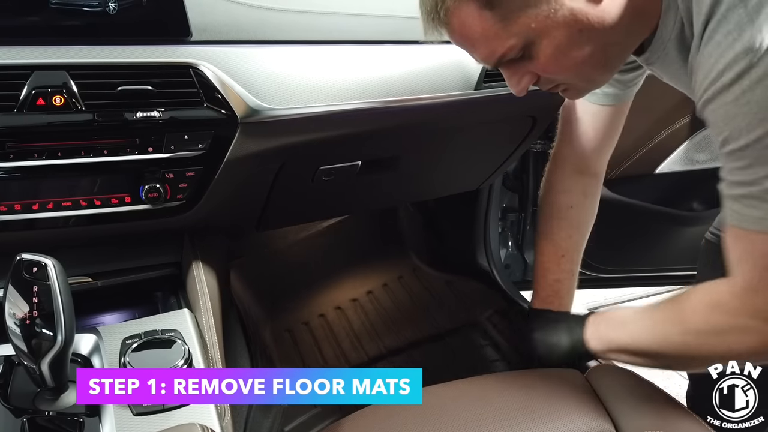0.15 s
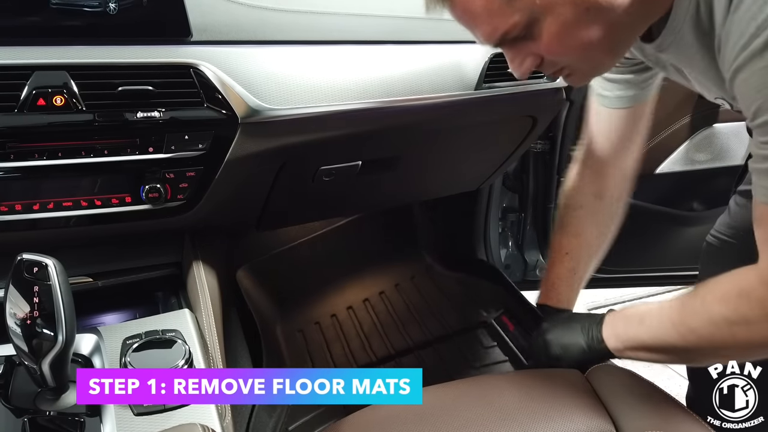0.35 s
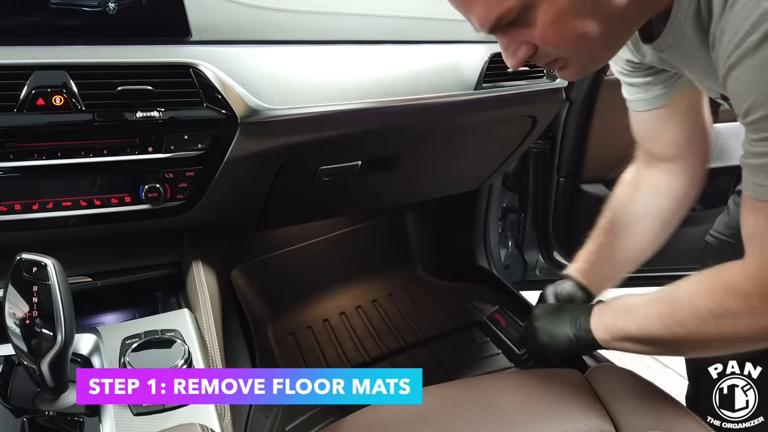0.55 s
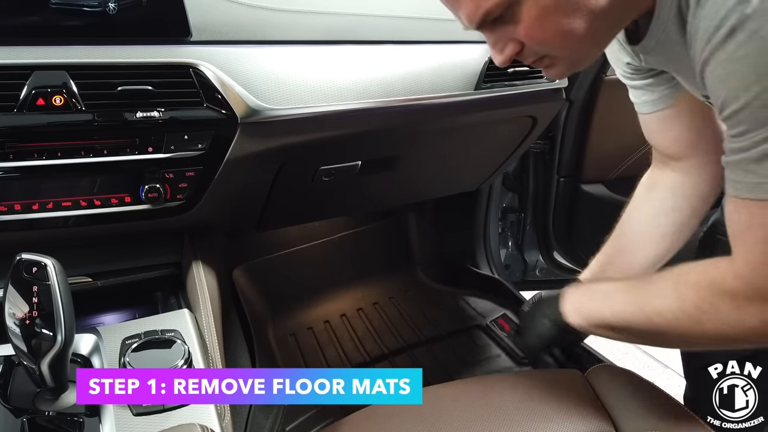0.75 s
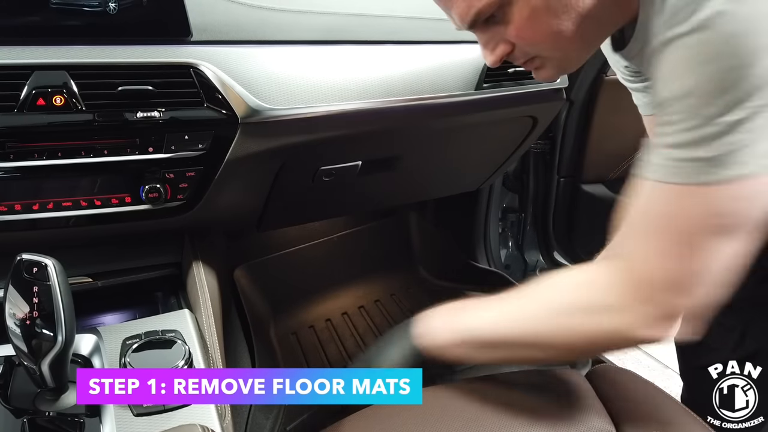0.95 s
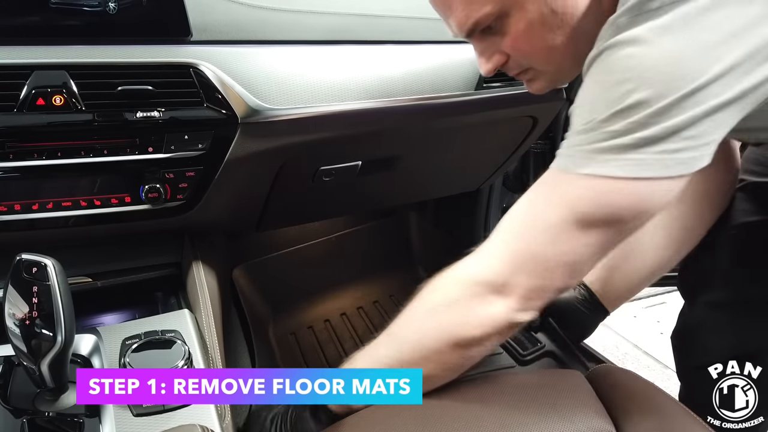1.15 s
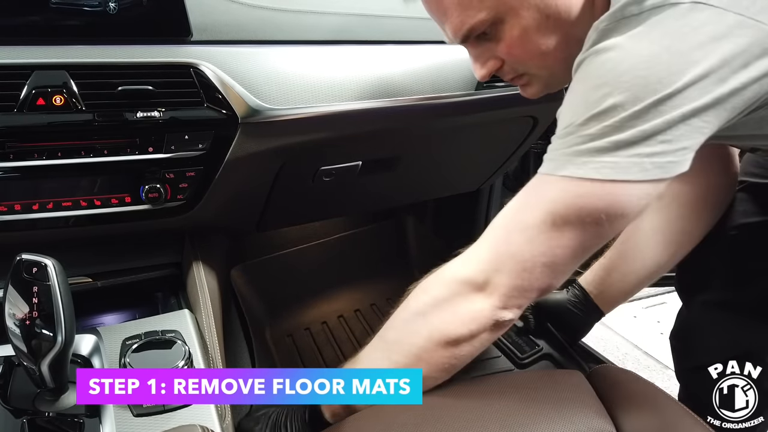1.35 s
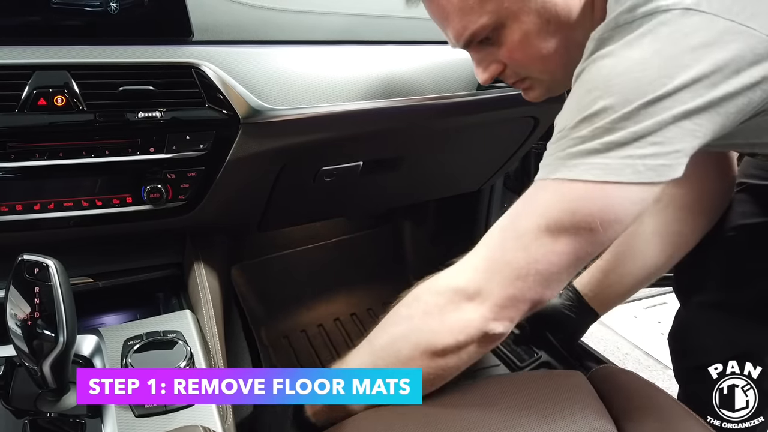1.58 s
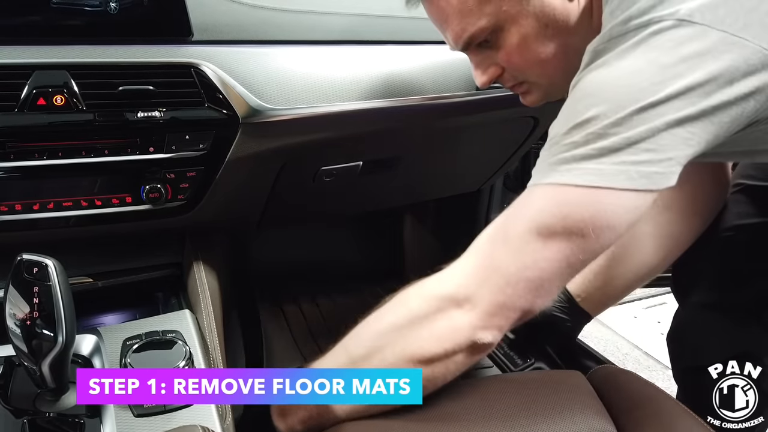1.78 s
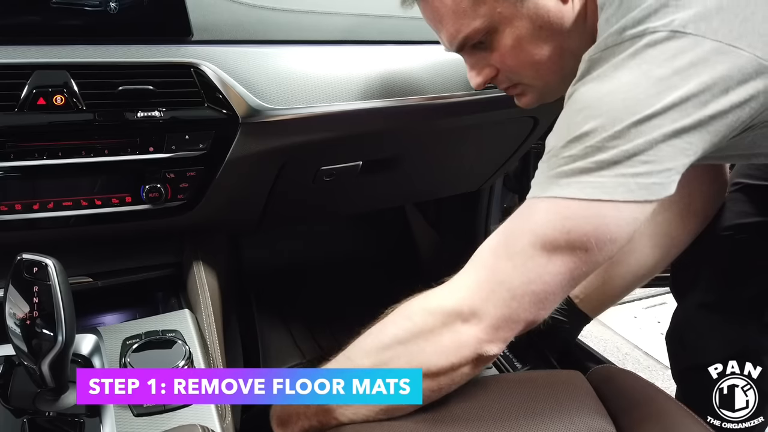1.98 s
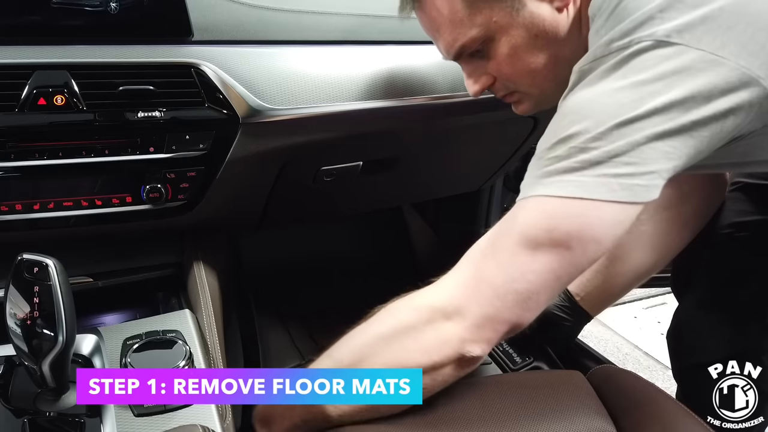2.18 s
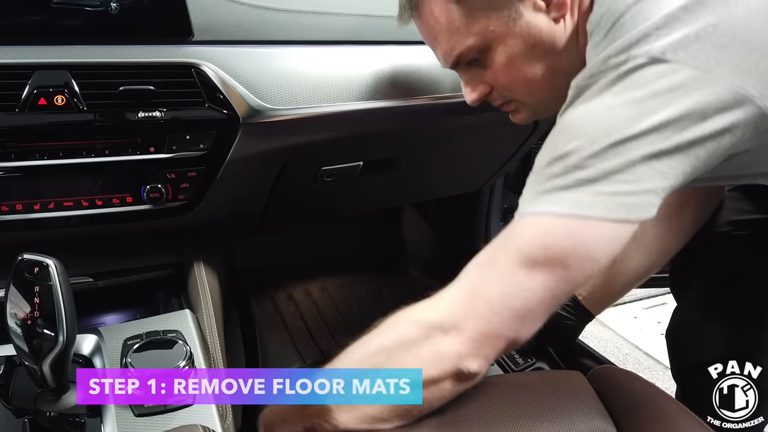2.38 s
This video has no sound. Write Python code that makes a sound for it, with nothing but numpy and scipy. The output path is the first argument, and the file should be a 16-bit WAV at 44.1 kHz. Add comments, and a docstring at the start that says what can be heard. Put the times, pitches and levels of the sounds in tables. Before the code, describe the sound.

Heard close inside a quiet car cabin: a rubber mat thuds in the footwell, scrapes softly and bends with low rumbles, then flops twice around two seconds with short cracks, leaving a faint garage tail.

```python
"""A faint bed of air, then a dull thump: a rubber floor mat worked loose in a car footwell,
heard close by from inside the cabin with the door open. Damped modes and short noise make the flops,
grains the scuffs and the short cracks and knocks of the flops, wavering tones the judders on the trim,
and shaped noise the flexing sheet, the sleeves and the air. A faint noise tail is the garage outside."""
import sys
import numpy as np
from scipy import signal
from scipy.fft import rfft, irfft
from scipy.io import wavfile
from scipy.ndimage import uniform_filter1d

SR = 44100
rng = np.random.default_rng(int(sys.argv[2]) if len(sys.argv) > 2 else 0)


def digitize_waveform(pressure):
    """Quantize a signal to 16-bit integers and store it at the path in sys.argv[1].

    Rows of a 2-D input are taken as channels; values are limited to [-1, 1].
    """
    field = np.atleast_2d(pressure).T
    bounded = np.clip(field, -1, 1)
    quanta = np.round(bounded * 32767).astype(np.int16)
    wavfile.write(sys.argv[1], SR, quanta)


N = 105840  # samples, 2.4 s

# Spectrum of the background air: [f/Hz, relative level/dB]
AIR_SPECTRUM = [(20, -2.5), (60, 5), (120, -26), (250, -20), (500, -20.5), (1100, -24), (2500, -29),
                (4000, -36), (9000, -42), (10400, -38), (12000, -40), (14000, -62)]
AIR_DB = -63.5
# Side against mid, narrow in the bass and wide in the treble: [f/Hz, level/dB]
STEREO_WIDTH = [(50, -23.5), (150, -39.5), (700, -21), (1400, -10.5), (2800, -4.5), (5000, -2), (15000, -2)]
LEFT_LAG_S = 0.00007
TOP_HZ = 15560

# Spectrum of the garage tail: [f/Hz, relative level/dB]
GARAGE_SPECTRUM = [(60, -12.5), (180, 0.5), (320, -3), (600, -3), (1800, -3.5), (3000, 6.5), (15000, -5)]
GARAGE_DB, GARAGE_T60_S, GARAGE_ATTACK_S = -15, 0.89, 0.016
# Resonances of the cabin that colour grains, tail, rustle and air: [f/Hz, width/Hz, boost/dB]
CABIN_RESONANCES = [(1328, 20, 4.5), (1683, 25, 0.5), (2434, 27, 4.5), (2665, 61, 5.5)]

# Rustle of sleeves and gloves over time: [t/s, level before the lift/dB]
RUSTLE_LEVELS = [(0, -104), (0.195, -80.5), (0.21, -55.5), (0.26, -68), (0.38, -80.5), (0.53, -82),
                 (0.625, -59), (0.69, -67.5), (0.75, -65), (0.78, -69), (0.82, -65), (0.93, -78.5),
                 (1.1, -79.5), (1.29, -71), (1.37, -80), (1.52, -83), (1.56, -73.5), (1.7, -71.5),
                 (1.895, -76), (1.915, -65), (1.96, -75.5), (2.04, -68), (2.21, -83), (2.265, -63.5),
                 (2.31, -73)]
# Spectrum of the rustle: [f/Hz, relative level/dB]
RUSTLE_SPECTRUM = [(400, -9.5), (1500, 6.5), (3000, 3.5), (6000, -3), (8200, -1.5), (9600, -0.5),
                   (10400, 7.5), (11400, -3), (15500, -11)]
RUSTLE_LIFT_DB, RUSTLE_FLICKER_DB = 4, 1.5

# Flexing of the sheet over time: [t/s, level before lift and ceiling/dB]
FLEX_LEVELS = [(0, -69), (0.075, -53.5), (0.11, -63.5), (0.19, -73), (0.24, -43), (0.31, -46),
               (0.56, -48.5), (0.6, -39), (0.76, -63.5), (0.84, -47), (0.95, -54.5), (1.21, -68.5),
               (1.27, -45), (1.36, -55), (1.54, -67), (1.59, -44), (1.68, -54.5), (1.72, -37.5),
               (1.89, -49), (2.0, -36.5), (2.4, -48.5)]
# Spectrum of the flexing: [f/Hz, relative level/dB]
FLEX_SPECTRUM = [(15, -11), (33, 3), (60, -4.5), (85, -11), (135, -17), (400, -36), (1000, -98.5)]
FLEX_LIFT_DB, FLEX_CEILING_DB = 2.5, -38.5

# Rubber sticking and slipping on the trim:
# [t at the peak/s, half length/s, f/Hz, jitter/share of f, level at the peak/dB]
JUDDER_EVENTS = [(0.803, 0.018, 1541, 0.085, -59), (0.992, 0.03, 330.4, 0.067, -52.5),
                 (1.07, 0.078, 1130, 0.022, -72), (1.369, 0.036, 383, 0.146, -52.5),
                 (1.565, 0.0065, 409.4, 0.042, -41.5)]
JUDDER_FLUTTER_DB, JUDDER_DRIFT = 3, 0.012  # drift as a share of the pitch

# Rubber scuffs over carpet, and short bright cracks and knocks of the flops, before the cabin colours them:
# [t at the peak/s, half length/s, level at the peak/dB, low edge f/Hz, cut-off f/Hz]
SCUFF_AND_CRACK_EVENTS = [(0.2, 0.0095, -49, 649, 1980), (0.373, 0.12, -59, 590, 1150),
                          (0.605, 0.063, -53.5, 280, 2490), (0.629, 0.011, -59.5, 1200, 2750),
                          (0.66, 0.047, -73, 1610, 3400), (0.815, 0.037, -57, 482, 1500),
                          (0.851, 0.011, -49, 370, 630), (0.911, 0.09, -66, 640, 1570),
                          (1.004, 0.021, -53.5, 89, 441), (1.294, 0.02, -67, 886, 1400),
                          (1.344, 0.0041, -55, 310, 900), (1.379, 0.016, -52, 128.6, 1097),
                          (1.583, 0.054, -58.5, 141.4, 1770), (1.666, 0.0029, -60, 2090, 3000),
                          (1.706, 0.025, -59, 884, 1770), (1.756, 0.0054, -56.5, 490, 2520),
                          (1.797, 0.0048, -52.5, 276, 1490), (1.902, 0.21, -58, 280, 1660),
                          (1.921, 0.0048, -49, 1320, 2600), (2.021, 0.0083, -45.5, 2060, 2350),
                          (2.042, 0.0052, -38.5, 148, 1190), (2.065, 0.015, -35.5, 98, 860),
                          (2.079, 0.016, -42, 336, 2010), (2.103, 0.009, -44, 2000, 3060),
                          (2.137, 0.0089, -47, 700, 2300), (2.247, 0.056, -59, 150, 2070),
                          (2.371, 0.027, -52.5, 417, 1520)]
# Spectrum of their grains: [f/Hz, relative level/dB]
GRAIN_SPECTRUM = [(70, -10), (140, 10.5), (270, -1.5), (420, 11.5), (700, 3), (1400, -1.5), (2700, -6),
                  (5000, -17), (12000, -25)]
GRAINS_PER_S, GRAIN_SPREAD_DB = 1700, 2

# Flops and rebounds of the mat, levels relative to the parts below:
# [t/s, floor boom level/dB, trim ring level/dB, slap level/dB, contact cut-off f/Hz,
#  air pop f/Hz, air pop level before doubling/dB]
THUMP_EVENTS = [(0.2027, 1, 4.5, 1, 2050, 595, -7), (0.2198, -11.5, -13, -21, 800, 287, -16.5),
                (0.273, -14.5, -32, -19.5, 600, 327, -31.5), (0.577, -27, -36, -43, 690, 352, -31),
                (0.842, -27, -21, -36.5, 660, 503, -44.5), (1.912, 0, -7, -5, 890, 366.7, -10.5),
                (1.958, -14.5, -48, -24, 427, 300, -23.5), (2.0118, -21.5, -44, -14.5, 2100, 517, -19.5),
                (2.0947, 2.5, -0.5, -1, 953, 393, -14), (2.1403, -24.5, -36, -19.5, 2490, 556, -28),
                (2.346, -49, -28, -34, 1560, 581, -35)]
# Spectrum of the slap: [f/Hz, relative level/dB]
SLAP_SPECTRUM = [(60, 4.5), (150, 3), (280, 2.5), (550, 5.5), (1000, -3.5), (1700, -9), (2200, -14.5),
                 (3000, -22), (6000, -27.5), (15000, -12)]
SLAP_DB, SLAP_T60_S, SLAP_ATTACK_S = -10.5, 0.019, 0.0026
CABIN_DB, CABIN_T60_S = -10, 0.11  # slower decay of the slap in the cabin, level against the slap
POP_T60_S = 0.018
# Boom of the floor pan: [f/Hz, level/dB, t60/s]
FLOOR_MODES = [(58.9, -19.5, 0.15), (102, -19, 0.1), (136.6, -15, 0.11), (212.2, -20.5, 0.082)]
FLOOR_LAG_S, FLOOR_ATTACK_S = 0.00059, 0.0017
# Ring of the footwell trim: [f/Hz, level/dB, t60/s]
TRIM_MODES = [(371, -38.5, 0.22), (598.5, -33.5, 0.077), (806, -23.5, 0.027), (974, -21, 0.021),
              (1211, -28, 0.032), (1382, -27.5, 0.041), (1604, -36.5, 0.021), (1583, -30.5, 0.046),
              (1796, -28, 0.029)]


def amp(db):
    """Decibels to gain."""
    return 10 ** (np.asarray(db) / 20)


def unit(x):
    """Scale to rms 1."""
    return x / np.sqrt(np.mean(x ** 2))


def gains(points):
    """Gain of a (Hz, dB) curve at each frequency bin."""
    hz, db = np.array(points, float).T
    bins = np.fft.rfftfreq(N, 1 / SR) + 1  # the extra 1 Hz keeps the log finite
    return amp(np.interp(np.log(bins), np.log(hz), db))


def colour(x, points):
    """Causal, minimum-phase filter with the given spectrum, by folding its cepstrum."""
    cepstrum = irfft(np.log(gains(points)), N)
    cepstrum[1:N // 2] *= 2
    cepstrum[N // 2 + 1:] = 0
    response = np.exp(rfft(cepstrum))
    return irfft(rfft(x) * response, N)


def spread(pair):
    """Two unrelated signals as left and right: alike in the bass, apart in the treble."""
    mid, side = pair[0], colour(pair[1], STEREO_WIDTH)
    return np.array([mid + side, mid - side])


def noise(points):
    """Stereo noise of rms 1 with the given spectrum."""
    return unit(spread(colour(rng.standard_normal((2, N)), points)))


def walk(rate):
    """Smooth random wander of rms 1, averaged twice over 1/rate seconds."""
    k = int(SR / rate)
    once = uniform_filter1d(rng.standard_normal(N), k)
    return unit(uniform_filter1d(once, k))


def level_at(t, points):
    """Level in dB at each moment, in straight lines between the (s, dB) points."""
    return np.interp(t, *np.array(points).T)


def fade(age, t60):
    """Exponential decay by 60 dB in t60 seconds, silent before its start."""
    return (age >= 0) * np.exp(-np.log(1000) * np.maximum(age, 0) / t60)


def rise(age, seconds):
    """Attack of a soft contact, with its time constant."""
    return 1 - np.exp(-np.maximum(age, 0) / seconds)


def swell(t, peak, half):
    """Bell-shaped swell that has dropped to 1/e at a half length from its peak."""
    return np.exp(-((t - peak) / half) ** 2)


def ring(age, modes):
    """Damped modes struck at age zero; neighbours swing in opposite directions."""
    out = 0
    for k, (hz, db, t60) in enumerate(modes):
        out = out + (-1) ** k * amp(db) * fade(age, t60) * np.sin(2 * np.pi * hz * age)
    return out


def soften(x, hz):
    """Low-pass of a soft contact."""
    sos = signal.butter(2, min(hz, SR / 3), fs=SR, output="sos")
    return signal.sosfilt(sos, x + 1e-18)  # the tiny offset avoids denormals


def band(x, low_hz, high_hz):
    """Steep band-pass, a high-pass followed by a low-pass."""
    for edge, kind in ((low_hz, "high"), (high_hz, "low")):
        sos = signal.butter(3, min(edge, SR / 3), kind, fs=SR, output="sos")
        x = signal.sosfilt(sos, x)
    return x


def air():
    """Steady background air, mostly bass."""
    return amp(AIR_DB) * noise(AIR_SPECTRUM)


def garage(x, t):
    """Faint diffuse tail that comes back through the open door: decaying noise convolved with the source."""
    tail = spread(colour(rng.standard_normal((2, N)), GARAGE_SPECTRUM))
    tail = tail * fade(t, GARAGE_T60_S) * rise(t, GARAGE_ATTACK_S)
    tail = tail / np.sqrt(np.sum(tail ** 2) / 2)  # mean energy 1 per channel
    return amp(GARAGE_DB) * signal.fftconvolve(x, tail, axes=1)[:, :N]


def cavity(x):
    """The enclosed footwell lifts a few narrow bands."""
    f = np.fft.rfftfreq(N, 1 / SR)
    response = 1
    for hz, width, db in CABIN_RESONANCES:
        response = response + (amp(db) - 1) / (1 + 2j * (f - hz) / width)
    return irfft(rfft(x) * response, N)


def rustle(t):
    """Cloth and gloves slide as the arms reach in: flickering shaped noise."""
    level_db = RUSTLE_LIFT_DB + level_at(t, RUSTLE_LEVELS) + RUSTLE_FLICKER_DB * walk(66)
    return noise(RUSTLE_SPECTRUM) * amp(level_db)


def flexing(t):
    """The bending sheet pumps the air of the footwell: low noise that follows the bending."""
    level_db = np.minimum(FLEX_LIFT_DB + level_at(t, FLEX_LEVELS), FLEX_CEILING_DB)
    return noise(FLEX_SPECTRUM) * amp(level_db)


def judders(t):
    """Short stick-slip tones whose pitch trembles and drifts and whose strength flutters."""
    out = 0
    for peak, half, hz, jitter, db in JUDDER_EVENTS:
        pitch = hz * (1 + jitter * walk(309.0) + JUDDER_DRIFT * walk(21.1))
        phase = 2 * np.pi * np.cumsum(pitch) / SR
        tone = unit(np.sin(phase) * amp(JUDDER_FLUTTER_DB * walk(260)))
        out = out + tone * amp(db) * swell(t, peak, half)
    return out


def scuffs_and_cracks(t):
    """Dense grains of uneven strength swell and fade with each scuff, or briefly with a crack or knock."""
    happens = rng.random((2, N)) < GRAINS_PER_S / SR
    strength = rng.standard_normal((2, N)) * amp(GRAIN_SPREAD_DB * rng.exponential(size=(2, N)))
    grain = spread(colour(happens * strength, GRAIN_SPECTRUM))
    out = 0
    for peak, half, db, low_hz, high_hz in SCUFF_AND_CRACK_EVENTS:
        out = out + unit(band(grain, low_hz, high_hz)) * amp(db) * swell(t, peak, half)
    return out


def slap(age):
    """Burst of noise from the rubber, with a weaker, slower decay in the cabin."""
    decay = fade(age, SLAP_T60_S) + amp(CABIN_DB) * fade(age, CABIN_T60_S)
    return noise(SLAP_SPECTRUM) * rise(age, SLAP_ATTACK_S) * decay


def air_pop(age, hz, db):
    """Air trapped beneath the mat pops out as one short damped tone."""
    return 2 * rise(age, SLAP_ATTACK_S) * ring(age, [(hz, db, POP_T60_S)])


def floor_boom(age):
    """The floor pan answers slightly late in a few low modes, of reversed polarity."""
    late = age - FLOOR_LAG_S
    return -rise(late, FLOOR_ATTACK_S) * ring(late, FLOOR_MODES)


def thumps(t):
    """Each flop slaps, pops, rings the trim, then booms the floor; a softer contact is duller."""
    out = 0
    for start, floor_db, trim_db, slap_db, cutoff_hz, pop_hz, pop_db in THUMP_EVENTS:
        age = t - start
        hit = amp(floor_db) * floor_boom(age)
        hit = hit + air_pop(age, pop_hz, pop_db)
        hit = hit + amp(trim_db) * ring(age, TRIM_MODES)
        hit = hit + amp(SLAP_DB + slap_db) * slap(age)
        out = out + soften(hit, cutoff_hz)
    return out


def scene():
    """The mat with its tail and the background air, reaching the right side a little earlier."""
    t = np.arange(N) / SR
    tones_and_thumps = thumps(t) + judders(t)
    grains = scuffs_and_cracks(t)
    tail = garage(tones_and_thumps + grains, t)
    coloured = cavity(grains + tail + rustle(t) + air())
    left, right = tones_and_thumps + flexing(t) + coloured
    late = np.exp(-2j * np.pi * np.fft.rfftfreq(N, 1 / SR) * LEFT_LAG_S)
    return np.array([irfft(rfft(left) * late, N), right])


def record(dry):
    """The recorder cuts the top with a steep low-pass."""
    sos = signal.ellip(10, 0.2, 80, TOP_HZ, fs=SR, output="sos")  # ripple and stop-band in dB
    return signal.sosfilt(sos, dry)


dry = scene()
out = record(dry)
digitize_waveform(out)
```